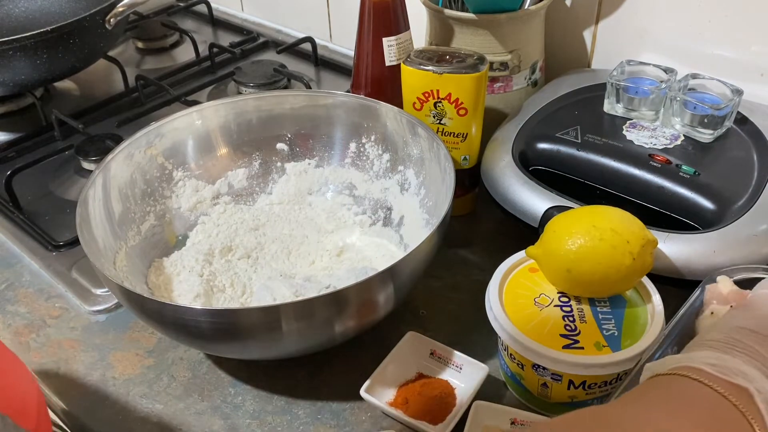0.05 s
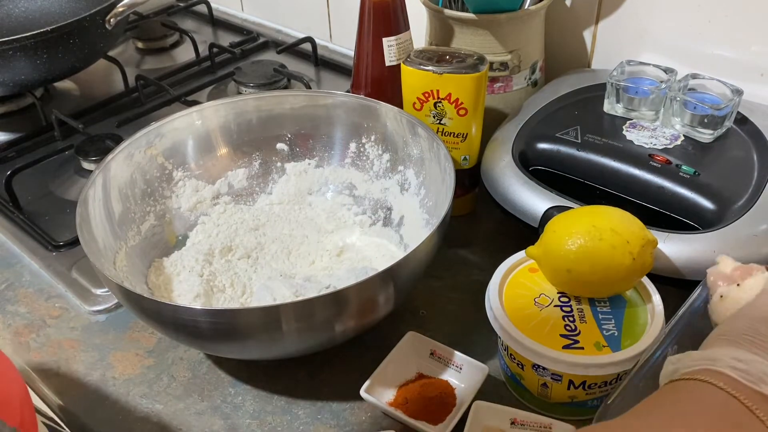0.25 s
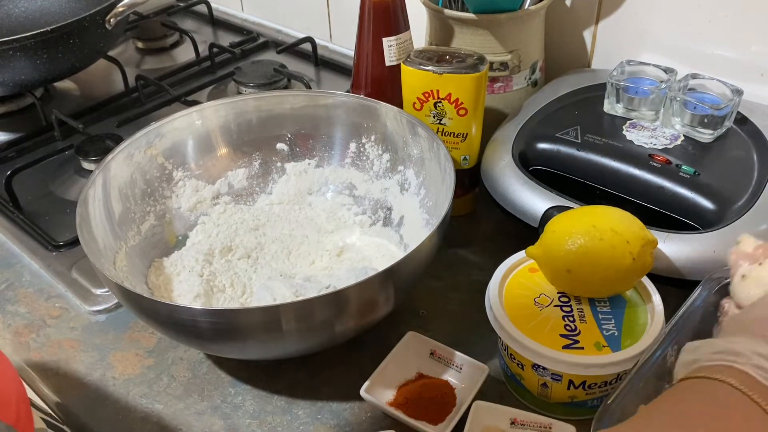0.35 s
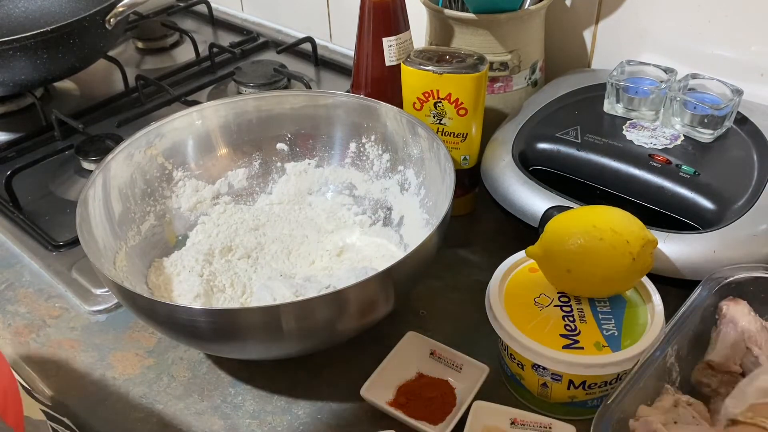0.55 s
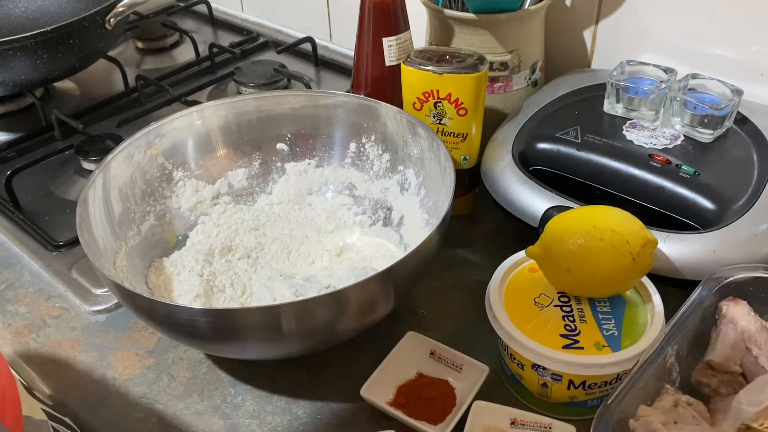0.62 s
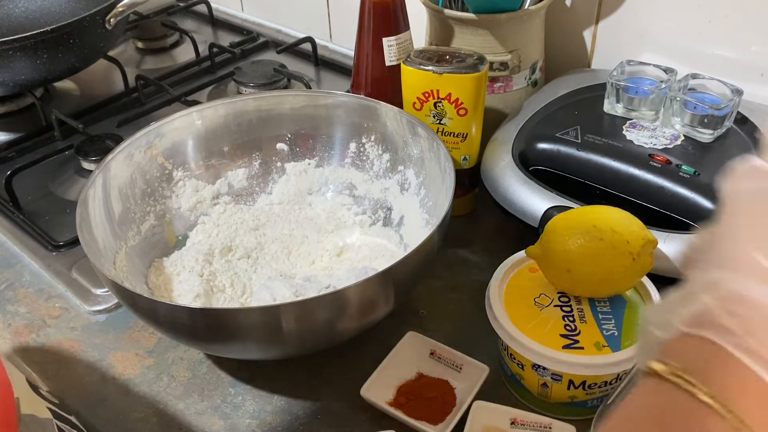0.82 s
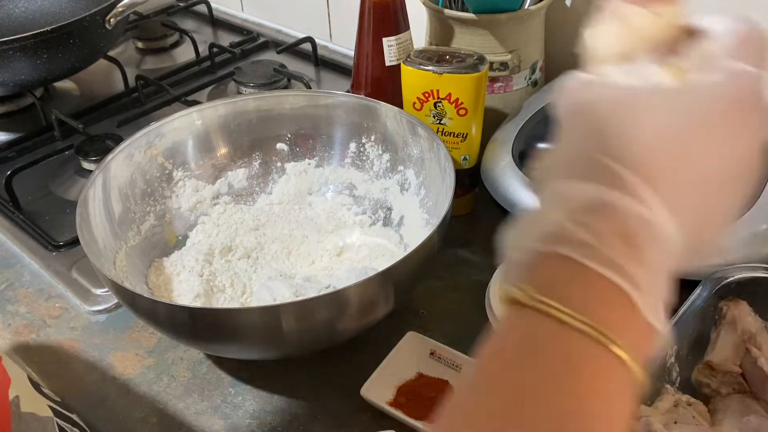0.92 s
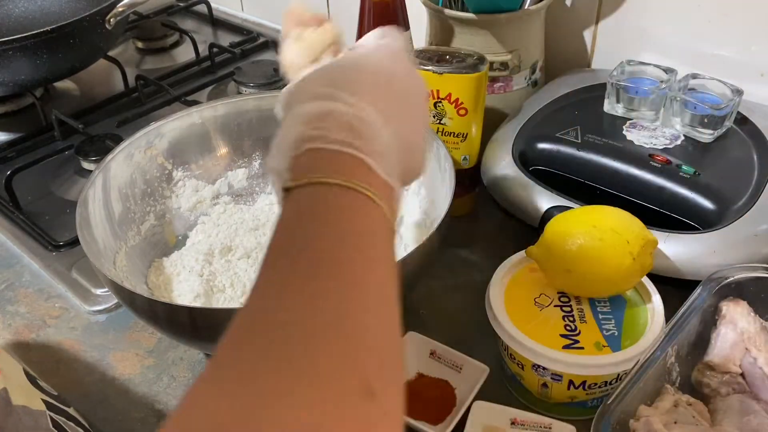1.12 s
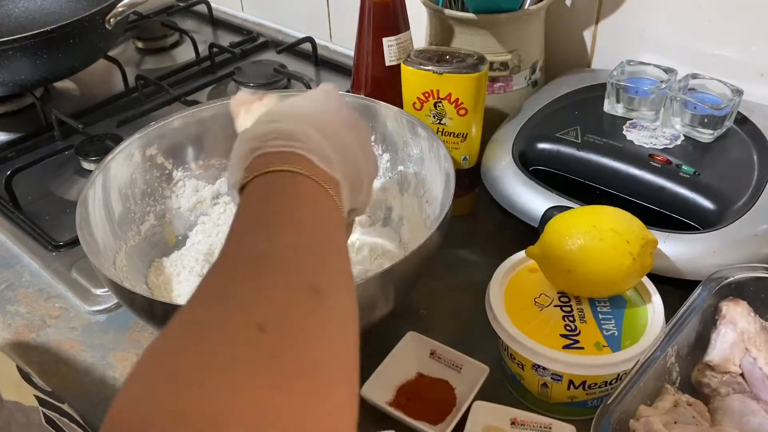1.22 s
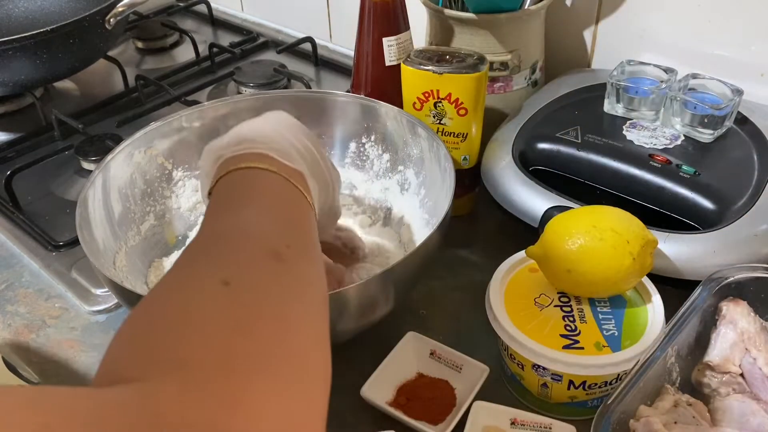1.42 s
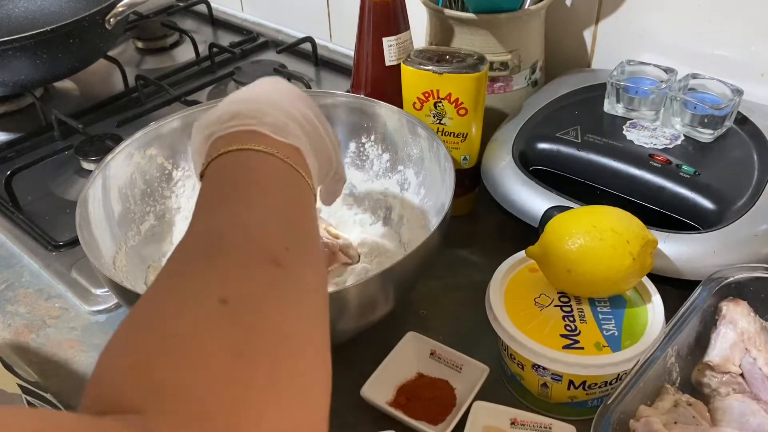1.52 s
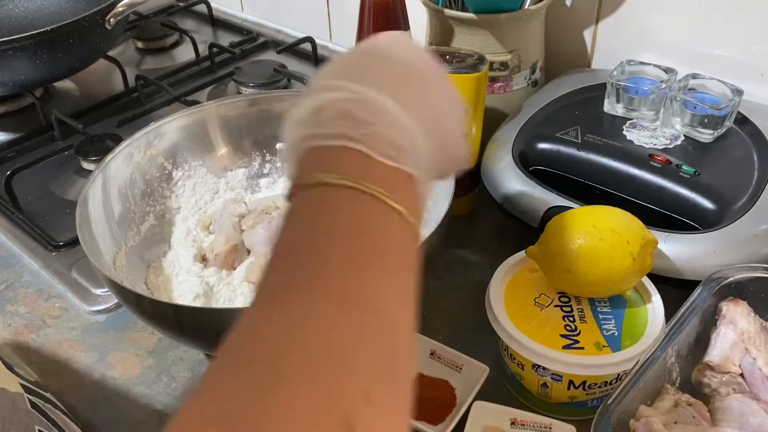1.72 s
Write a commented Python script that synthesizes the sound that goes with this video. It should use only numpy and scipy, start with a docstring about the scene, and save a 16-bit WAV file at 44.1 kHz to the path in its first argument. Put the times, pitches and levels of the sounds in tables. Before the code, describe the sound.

Two dull thuds as a plastic tub knocks and raw chicken drops into flour.

```python
"""Sticky ticks and a rustle as a gloved hand lifts raw chicken from a plastic tub, which knocks on the
kitchen bench and rocks to rest. A nudged dish rings faintly, then the chicken drops into a steel bowl
of flour: a soft, damped thud with a wet slap. The small kitchen rings briefly after each impact,
over a low rumble, a hum and a faint, high, steady hiss."""
import sys
import numpy as np
from scipy import signal
from scipy.fft import rfft, irfft
from scipy.io import wavfile

SR = 44100
rng = np.random.default_rng(int(sys.argv[2]) if len(sys.argv) > 2 else 0)


def materialize(psi):
    """Save the field psi as 16-bit PCM at rate SR to the path in sys.argv[1].

    A 1-D psi becomes a single channel; in a 2-D psi each row is a channel.
    """
    bounded = np.clip(np.atleast_2d(psi).T, -1, 1)
    quanta = np.round(bounded * 32767).astype(np.int16)
    wavfile.write(sys.argv[1], SR, quanta)


N = 77175
T = np.arange(N) / SR
FFT_SIZE = 2 * N
F = np.maximum(np.fft.rfftfreq(FFT_SIZE, 1 / SR), 1)
TOP_HZ = 15550
TUB_PAN_DB, BOWL_PAN_DB, HAND_PAN_DB, AIR_PAN_DB = 2.5, 0.5, 2, 2
TUB_LAG_MS, BOWL_LAG_MS, HAND_LAG_MS = .2, .18, .289


def amp(db):
    """Decibels to gain."""
    return 10 ** (np.asarray(db) / 20)


def unit(x):
    """Scale to rms 1."""
    return x / np.sqrt(np.mean(x ** 2))


def shape(x, gain):
    """Filter by a gain for each frequency."""
    return irfft(rfft(x, FFT_SIZE) * gain, FFT_SIZE)[..., :N]


def colour(points):
    """EQ curve from (f/Hz, level/dB) points."""
    hz, db = np.array(points).T
    return amp(np.interp(np.log(F), np.log(hz), db))


def envelope(points):
    """Fader ride from (t/s, level/dB) points."""
    return amp(np.interp(T, *np.array(points).T))


def decay(start, t60):
    """Hard attack and exponential decay."""
    return (T >= start) * np.exp(-np.log(1000) * np.maximum(T - start, 0) / t60)


def place(x, pan_db, lag_ms=0):
    """Pan a sound: the left side is pan_db louder and lag_ms later than the right."""
    side = np.array([[1], [-1]]) / 2
    delay = np.exp(-2j * np.pi * F * side * lag_ms / 1000)
    return shape(x, amp(side * pan_db) * delay)


def diffuse(gain=1, wide_hz=486):
    """Stereo noise: centred in the bass, wide above wide_hz."""
    mid, side = rng.standard_normal((2, N))
    side = shape(side, F / np.hypot(F, wide_hz))
    return unit(shape(np.array([mid + side, mid - side]), gain))


def burst(start, t60, gain):
    """A decaying spray of noise with a given spectrum."""
    return shape(rng.standard_normal(N) * decay(start, t60), unit(gain))


def thud(blows, modes):
    """Soft pushes ring a body's modes; neighbouring modes swing opposite ways, longer contact is duller."""
    ring = sum((-1) ** k * amp(db) * np.sin(2 * np.pi * hz * T) * decay(0, t60)
               for k, (hz, db, t60) in enumerate(modes))
    push = 0
    for start, db, contact_ms in blows:
        bump = np.exp(-.5 * ((T - start) * 6000 / contact_ms) ** 2)  # contact spans six sigmas
        push = push + amp(db) * bump / bump.sum()
    return shape(push, rfft(ring, FFT_SIZE))


def room_tone():
    """A steady bed of low rumble, hum and hiss with narrow whistling bands."""
    # spectra of the rumble, the wide hiss and the top hiss from one direction: f/Hz, level/dB
    rumble_eq = [(20, -43), (38, -43), (47, -2.5), (60, -4), (72, 0.5), (87, -1.5), (120, -12),
                 (180, -13.5), (280, -13), (380, -21.5), (520, -21.5), (800, -30), (1250, -27),
                 (2500, -31.5), (4000, -43), (16000, -71.5)]
    hiss_eq = [(2000, -9), (4000, -12), (5000, -4), (5550, -5), (6000, -4.5), (6500, -4.5), (7700, -15.5),
               (8500, -13.5), (11000, -35), (16000, -52)]
    top_eq = [(4000, 6), (7000, 1), (8500, -2), (10000, 8), (11200, -56), (14500, -2), (16000, -39)]
    # hum tones: f/Hz, level/dB
    hum_tones = [(49.5, -58.5), (149, -65)]
    # whistles in the hiss: f/Hz, half-width/Hz, level/dB
    whistle_bands = [(4454, 6.2, -84.5), (5215, 9.2, -76), (5300, 105, -76), (5807, 160, -73.5),
                     (6070, 17, -78.5), (6150, 110, -82.5), (7700, 29, -88.5)]
    rumble = amp(-57) * diffuse(colour(rumble_eq))
    hum = sum(amp(db) * unit(np.sin(2 * np.pi * (hz * T + rng.random()))) for hz, db in hum_tones)
    hiss = amp(-67) * diffuse(colour(hiss_eq))
    whistles = sum(amp(db) * diffuse(1 / (1 + ((F - hz) / width) ** 4))
                   for hz, width, db in whistle_bands)
    top_hiss = amp(-74) * unit(shape(rng.standard_normal(N), colour(top_eq)))
    bed = place(rumble + hum + hiss, AIR_PAN_DB)
    return bed + place(whistles, pan_db=13) + place(top_hiss, HAND_PAN_DB, HAND_LAG_MS)


def kitchen_reverb(send):
    """Dense reflections that build up quickly and die sooner in the high treble."""
    # reverb time: f/Hz, t60/s
    decay_times = [(60, 0.36), (250, 0.3), (1000, .45), (4000, 0.38), (16000, 0.086)]
    # tone of the reflections: f/Hz, level/dB
    reverb_eq = [(40, -8), (110, -2.5), (200, 2), (330, 2), (550, -2), (1000, 2), (2000, -6.5), (6000, 0.5),
                 (16000, -32)]
    onset_s = 0.015
    noise = diffuse(wide_hz=312)
    hz, t60s = np.array(decay_times).T
    bands = [np.interp(np.log(F), np.log(hz), peak) for peak in np.eye(len(hz))]
    tail = sum(shape(noise, band) * decay(0, t60) for band, t60 in zip(bands, t60s))
    build_up = 1 - np.exp(-(T / onset_s) ** 2)
    response = rfft(tail * build_up, FFT_SIZE)
    response /= np.sqrt(np.mean(abs(response[:, F < 2000]) ** 2))
    return shape(send, response * colour(reverb_eq))


def soft_rings():
    """Faint tones swell softly and ring away: a nudged dish at 489 Hz, then two low 280 Hz rings as the hand
    moves."""
    # faint rings: t/s, level/dB, f/Hz, t60/s
    rings = [(0.538, -56, 488.6, 0.63), (.93, -56, 280, 0.55), (1.002, -59, 280, 0.39)]
    attack_s = 0.026
    return sum(amp(db) * np.sin(2 * np.pi * hz * T) * decay(start, t60)
               * np.clip((T - start) / attack_s, 0, 1) for start, db, hz, t60 in rings)


def handling():
    """Soft, low bumping as the hand moves."""
    # swells of movement: t/s, level/dB
    swells = [(0, -54), (.13, -53), (.19, -49.5), (.35, -48), (.47, -56.5), (.6, -64), (.88, -83),
              (.97, -57.5), (1.1, -69), (1.18, -68.5), (1.27, -60.5), (1.37, -59.5), (1.42, -64),
              (1.75, -57)]
    # dull tone of the bumps: f/Hz, level/dB
    bump_eq = [(40, -17), (90, 4), (150, -10.5), (210, -12), (285, -3), (370, -9.5), (500, -12.5),
               (750, -20), (1500, -22), (4000, -65)]
    return diffuse(colour(bump_eq)) * envelope(swells)


def rustle():
    """Dense fine grains of the thin glove and of flour."""
    # swells of the rustle: t/s, level/dB
    swells = [(0, -73), (.04, -68), (.08, -65), (.125, -63.5), (.18, -70), (.21, -71), (.32, -68.5),
              (1.1, -81.5), (1.195, -66.5), (1.24, -69), (1.3, -65), (1.34, -55.5), (1.4, -58.5),
              (1.43, -70), (1.455, -58), (1.5, -71), (1.55, -83), (1.75, -80)]
    # bright tone of the grains: f/Hz, level/dB
    grain_eq = [(300, -41), (1300, 8), (3000, 2), (6000, 3), (8500, 4), (10200, 4.5), (14000, -1.5),
                (16000, 7.5)]
    grain_samples, grain_db = 32, 3
    sizes = np.minimum(rng.exponential(size=N // grain_samples + 1), 3)
    grains = rng.standard_normal(N) * amp(grain_db * np.repeat(sizes, grain_samples)[:N])
    return unit(shape(grains, colour(grain_eq))) * envelope(swells)


def ticks():
    """Sticky skin peels from the glove in tiny bright snaps."""
    # snaps: t/s, level/dB, centre f/Hz, t60/s
    snaps = [(0.028, -45, 4820, 0.007), (0.029, -54, 12900, 0.021), (0.029, -45.5, 1500, 0.069),
             (0.055, -56, 9800, 0.013), (0.061, -39, 1660, 0.011), (0.1, -50.5, 4830, 0.015),
             (.115, -56, 9800, 0.013), (.1255, -60, 13800, 0.009), (0.151, -54.5, 4500, 0.044),
             (.189, -50, 6950, 0.021), (0.266, -52.5, 9150, 0.019), (.287, -58, 14000, .012),
             (1.35, -59, 10100, 0.015), (1.445, -53, 6560, 0.021), (1.601, -66, 13000, 0.043)]
    half_width_octaves = .32
    peeling = 0
    for start, db, hz, t60 in snaps:
        band = (F < TOP_HZ) / (1 + (np.log2(F / hz) / half_width_octaves) ** 2)
        peeling += amp(db) * burst(start, t60, band)
    return peeling


def slaps():
    """Short wet splats as the meat meets a surface."""
    # splats of wet skin: t/s, level/dB, t60/s
    splats = [(.1, -54.5, 0.14), (.122, -59, 0.041), (0.1986, -31, 0.05), (1.4309, -48.5, 0.051),
              (1.442, -51.5, 0.05)]
    # their mid-heavy tone: f/Hz, level/dB
    splat_eq = [(200, -40), (700, 7), (1400, 3), (2200, -5), (4200, -18.5), (5200, -30), (16000, -49)]
    return sum(amp(db) * burst(start, t60, colour(splat_eq)) for start, db, t60 in splats)


def tub_knock():
    """The plastic tub knocks on the bench, then rocks and settles."""
    # contacts with the bench: t/s, level/dB, contact/ms
    blows = [(.1989, -12, 0.86), (.2003, 7.5, 2.18), (.2067, 9, 7.4), (.2415, -12, 3.5),
             (.2585, -16.5, 2.8), (.2725, -11.5, 5.7), (.297, -7, 9.6)]
    # modes of tub and bench: f/Hz, level/dB, t60/s
    modes = [(99.3, -26, 0.17), (151.5, -14.5, 0.024), (215, -10.5, 0.035), (289.4, -6, .02),
             (338.4, -6, 0.0174), (390.6, -25, 0.13), (513.3, -19, 0.086), (646, -30, 0.11),
             (730, -45, 0.045), (835, -13.5, 0.043), (960, -21, 0.15), (1090, -6.5, 0.042),
             (1167, -13, 0.083), (1428, -29, 0.15)]
    low_cut_hz = 58
    return shape(thud(blows, modes), 1 / np.hypot(1, (low_cut_hz / F) ** 4))


def bowl_thud():
    """The chicken lands in the steel bowl, whose ring is damped by the flour."""
    # first touch, landing and slump: t/s, level/dB, contact/ms
    blows = [(1.4428, -45, 2.8), (1.4444, 3, 1.94), (1.4554, 4, 4.8)]
    # modes of the bowl and the bench under it: f/Hz, level/dB, t60/s
    modes = [(67, -39.5, 0.29), (100.4, -34.5, 0.21), (127.7, -32, 0.37), (179, -61, .1), (246.4, -26, 0.1),
             (290, -11, 0.022), (410.5, -35.5, 0.21), (477, -40, 0.16), (492, -10.5, 0.012),
             (596.5, -37, 0.25), (784, -10.5, 0.0119), (780, -14, 0.0193)]
    return -thud(blows, modes)


def scene():
    """Tub, bowl and slaps feed the kitchen reverb; the glove is close and stays dry."""
    tub, bowl = tub_knock(), bowl_thud()
    skin = place(slaps(), TUB_PAN_DB)
    glove = place(ticks() + rustle(), HAND_PAN_DB, HAND_LAG_MS)
    bumps = place(handling() + soft_rings(), AIR_PAN_DB)
    reverb = kitchen_reverb(amp(-10.5) * tub + amp(-7.5) * bowl + amp(-4) * skin)
    impacts = place(tub, TUB_PAN_DB, TUB_LAG_MS) + place(bowl, BOWL_PAN_DB, BOWL_LAG_MS)
    return room_tone() + reverb + bumps + glove + skin + impacts


def record(dry):
    """Master EQ: steep cuts take off the deepest bass and the very top."""
    low_cut_hz = 42
    low_cut = 1 / np.hypot(1, (low_cut_hz / F) ** 12)
    high_cut = signal.ellip(10, .2, 80, TOP_HZ, fs=SR, output="sos")
    return signal.sosfilt(high_cut, shape(dry, low_cut))


dry = scene()
out = record(dry)
materialize(out)
```